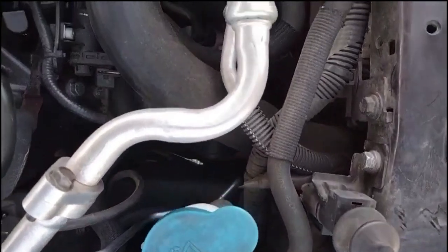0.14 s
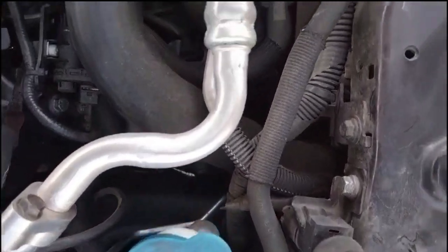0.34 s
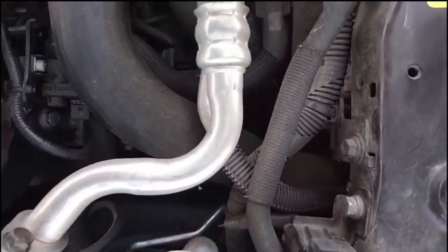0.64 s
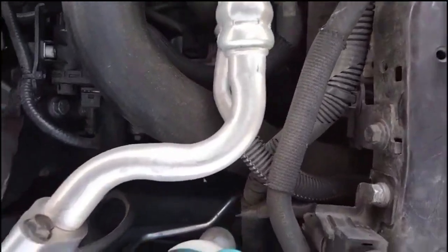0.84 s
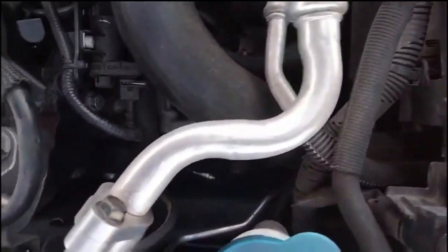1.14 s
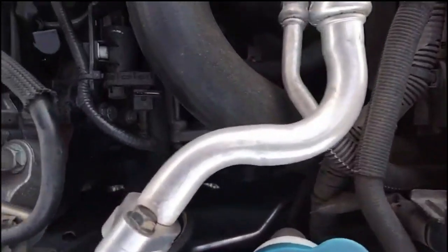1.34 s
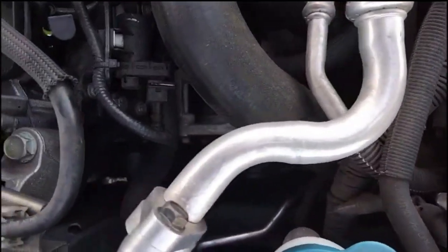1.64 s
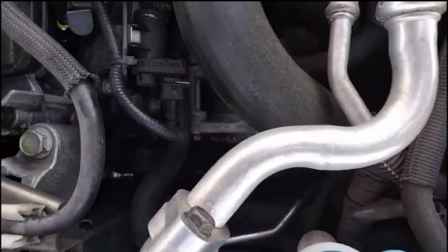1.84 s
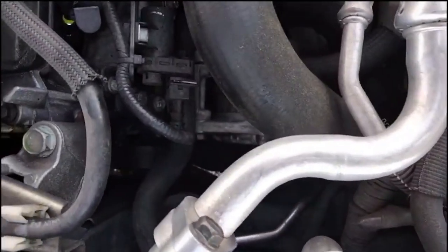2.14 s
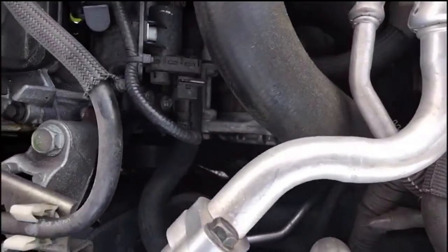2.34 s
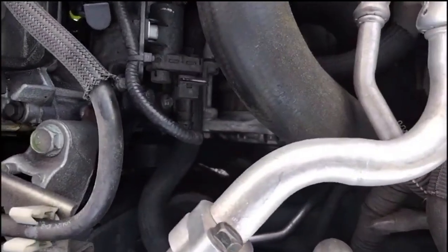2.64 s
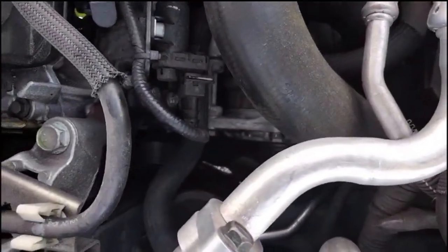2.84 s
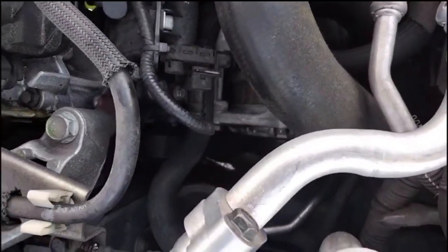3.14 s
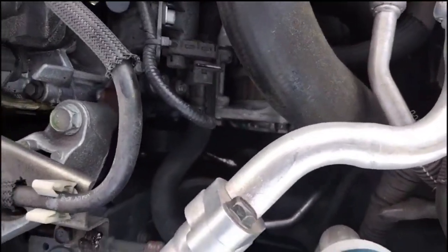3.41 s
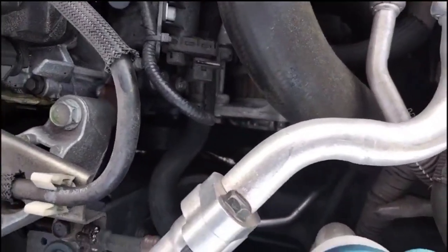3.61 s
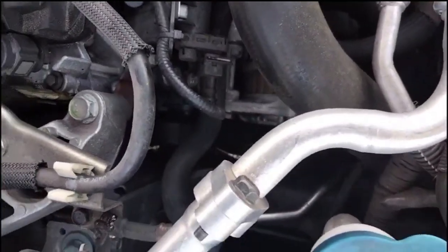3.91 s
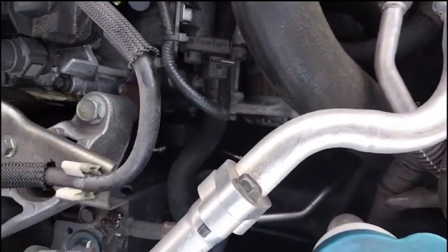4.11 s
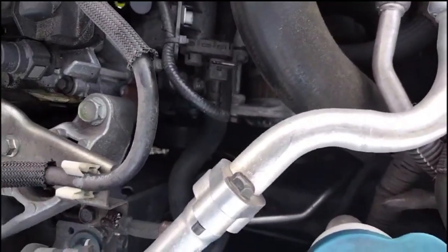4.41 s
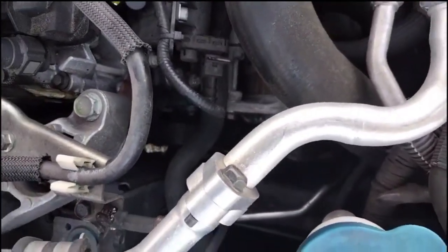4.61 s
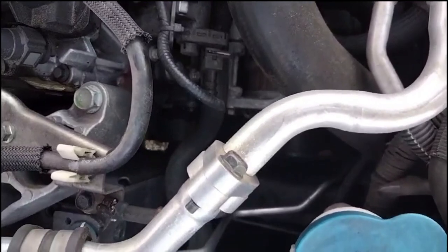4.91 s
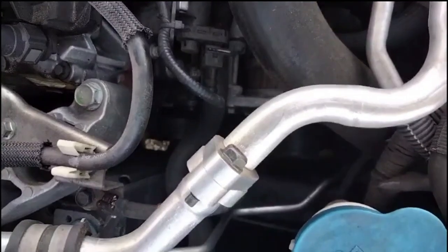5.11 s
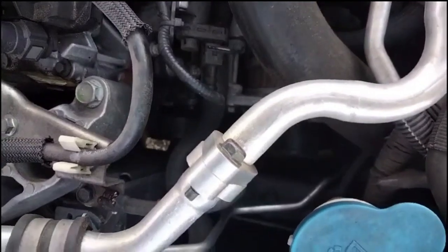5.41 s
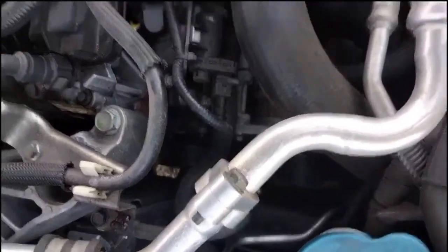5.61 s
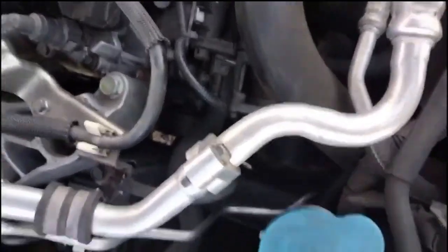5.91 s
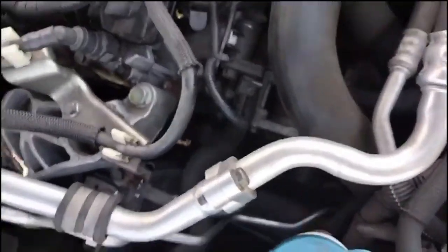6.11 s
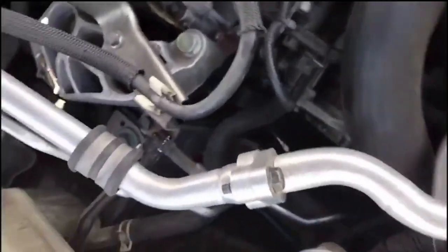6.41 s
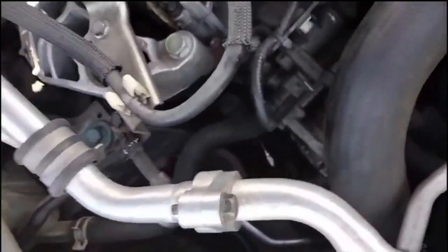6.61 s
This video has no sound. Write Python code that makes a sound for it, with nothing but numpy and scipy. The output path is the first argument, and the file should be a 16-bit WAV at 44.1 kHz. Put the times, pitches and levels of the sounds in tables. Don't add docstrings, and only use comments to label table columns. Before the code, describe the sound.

Close under an open bonnet, a four-cylinder diesel idles steadily, about twenty-eight dull thuds a second blurred into a rattling, knocking roar. In front of it a worn belt slips on its pulley, chirping in rapid bright squeaks that swell and thin several times a second, with a thin wavering whistle near the top of hearing. A small handheld recorder with pumping gain catches it, dry and bright.

```python
import sys
import numpy as np
from scipy import signal
from scipy.fft import rfft, irfft, next_fast_len
from scipy.io import wavfile
from scipy.ndimage import uniform_filter1d, minimum_filter1d, map_coordinates

SR = 44100
rng = np.random.default_rng(int(sys.argv[2]) if len(sys.argv) > 2 else 0)


def level_to_linear(level):
    exponent = np.asarray(level, float) / 20
    return 10 ** exponent


def to_wav(s):
    ch = np.atleast_2d(s).T
    pcm = np.round(np.clip(ch, -1, 1) * 32767)
    wavfile.write(sys.argv[1], SR, pcm.astype(np.int16))


N = 297675

IDLE_HZ = 14.155
BELT_LOOPS = .2926
STRAY_S = 0.01082
FULL_DB, KNEE_DB = -16, 3
STICK_DB = -28.5
SPREAD = 1.5

# time in seconds, lead in turns.
CRANK_DRIFT = [(0.0, -0.13), (0.4, -0.132), (0.9, -0.119), (1.4, -0.114), (1.9, -0.12), (2.4, -0.117),
               (2.9, -0.104), (3.4, -0.102), (3.9, -0.106), (4.4, -0.105), (4.9, -0.104), (5.4, -0.1),
               (5.9, -0.107), (6.4, -0.118), (6.75, -0.116)]
# time in seconds, level in dB.
BLOCK_LEVEL = [(0, -36.5), (1.1, -36.5), (2.1, -35.5), (3.4, -34.5), (4.5, -35.5), (5.4, -34.5), (6.1, -37),
               (6.75, -34)]
# centre in seconds, depth in dB, half width in seconds.
GAIN_DUCKS = [(1.14, -2, 0.057), (1.42, -5.5, 0.039), (1.8, -4.5, 0.041), (2.28, -4, 0.13),
              (2.55, -3.5, 0.053), (2.96, -3.5, 0.074), (3.11, -7, 0.046), (3.5, -4, 0.068),
              (3.9, -2, 0.082), (4.25, -4, .06), (4.68, -2, 0.14), (5.17, -1.5, 0.066), (5.44, -5.5, 0.048),
              (5.76, -7, 0.073), (6.38, -2.5, 0.049), (6.69, -5, 0.072)]
# frequency in Hz, density in dB per Hz.
AIR_SPECTRUM = [(2060, -10.5), (3500, -18), (4780, -10), (5460, -24), (6570, -5.5), (8970, 0),
                (9990, -10.5), (12600, -12.5), (14500, 1.5), (15400, -2), (16000, -36)]
# frequency in Hz, level in dB.
EXHAUST_PIPE = [(14, -52), (28, -3), (57, 2.5), (85, -9.5), (113, -13), (142, -9.5), (200, -20.5),
                (300, -22), (600, -60)]
# time in seconds, pitch in Hz, level in dB.
FAN = [
    (3.9, 49, -64),
    (4.4, 50.7, -41),
    (5.2, 48.1, -44),
    (6, 47.43, -43),
    (6.75, 48, -38),
]
# low knock in dB, high knock in dB, thud in dB,
# valve tick in dB, cover knock in dB.
CYLINDERS = [(-15, 3.5, 3, -6.5, -6.5), (4, 7, 1.5, -16, 8), (-12.5, 4.5, 2.5, -6, 4.5),
             (-5, 6.5, 1.5, -17.5, 7)]
# frequency in Hz, width in Hz, level in dB.
BLOCK_MODES = [(621, 12, 0.5), (667.3, 22, 11), (809, 30, -5)]
# frequency in Hz, width in Hz, level in dB.
HEAD_MODES = [(1400, 150, -10), (1670, 110, 0), (2050, 50, -2), (3430, 150, -8), (3930, 120, -11)]
# frequency in Hz, width in Hz, level in dB.
COVER_MODES = [(960, 270, 4.5), (1127, 70, 12.5)]
# frequency in Hz, level in dB.
GEARS = [(877.5, -49.5), (904.4, -56.5)]
# frequency in Hz, density in dB per Hz.
ROAR_SPECTRUM = [(20, -22), (40, -18), (70, -6), (110, -11.5), (389, -19.5), (671, -9), (1240, -20.5),
                 (1660, -17.5), (2050, -31), (2500, -24), (3350, -19), (4500, -26), (6000, -82)]
# time in seconds, level in dB.
WHISTLE_LEVEL = [(0.0, -30), (0.28, -26), (0.83, -31), (1.73, -21), (1.77, -29), (1.84, -24), (2.1, -21),
                 (2.16, -24.5), (2.71, -22), (3.14, -24.5), (3.27, -22.5), (5.38, -25), (5.43, -31),
                 (5.85, -17), (5.96, -26.5), (6.67, -30), (6.73, -33), (6.75, -25)]
# cycles a turn, swing in Hz, lag in cycles of the
WHISTLE_SWING = [(0.5852, 136, 0.88), (0.8778, 220, 0.22), (1.1704, 59, 0.97), (1.463, 85, 0.09),
                 (1.7556, 122, 0.81), (2.3408, 67, 0.94), (2.926, 59, 0.75), (3.2186, 57, 0.43),
                 (1, 173, 0.02), (2, 153, 0.08), (4, 56, 0.5), (4.628, 104, 0.6)]
# frequency in Hz, width in Hz, level in dB.
PULLEY_MODES = [(4855, 120, -11.5), (5060, 26, 1), (5353, 86, 0.5), (5510, 68, 1.5), (5790, 360, -3),
                (7500, 160, -4), (8450, 490, -5), (9135, 89, 0), (10500, 790, -9.5), (11600, 230, -13)]
# slip in dB, low tone in Hz, high over low tone in dB,
# high tone in Hz.
BELT_WEAR = [(-70, 6600, -1, 9220.0), (-55.5, 5470.0, 9, 8400), (-39.6, 5300.0, 7, 8300),
             (-36, 5490.0, -0.0, 9090.0), (-28, 5540.0, 1, 9190.0), (-32, 5420.0, 0.1, 8930.0),
             (-22, 5510.0, -2.5, 8690.0), (-27.5, 5700.0, 1.3, 8840.0), (-30.5, 5340.0, 2, 9260.0),
             (-24, 5340.0, -0.5, 9260.0), (-27, 5480.0, -1.8, 9160.0), (-19.5, 5510.0, 0.3, 9530.0),
             (-33.5, 5710.0, -3.5, 9260.0), (-36.5, 5650.0, -2, 9270.0), (-42.5, 5600.0, -5, 9190.0),
             (-30.5, 5370.0, -0.5, 8970.0), (-35.5, 5690.0, 1.5, 8470.0), (-84, 6600, 3, 9110.0),
             (-39, 5330.0, 3, 9210.0), (-28, 5200.0, -0.2, 9430.0), (-27.5, 5040.0, 3.5, 9570.0),
             (-30, 5490.0, -3.5, 9170.0), (-36, 5600.0, -6, 9420.0), (-22, 5560.0, -2, 8700),
             (-46.5, 5480.0, 4, 9030.0), (-38.5, 5480.0, 4, 8830.0), (-37, 5640.0, -3.5, 8190.0),
             (-49, 5560.0, -0.2, 8000)]
# cycles a turn, slip in dB, lag in cycles of the
JERK = [(0.5, 0.9, 0.16), (1.0, 6.1, 0.57), (2.0, 9.2, 0.1), (3.0, 1.0, 0.1), (4.0, 3.7, 0.83),
        (4.628, 2.0, 0.19), (2.628, 2.4, 0.15), (0.628, 2.7, 0.35), (6.628, 0.3, 0.03)]
# cycles a turn, low tone in Hz, its lag in cycles of the beat, high
# tone in dB, its lag in cycles of the beat.
TENSION = [(0.5, 10.4, 0.3, 0.9, 0.59), (1.0, 172.5, 0.04, 1.2, 0.64), (2.0, 172.2, 0.04, 1.8, 0.74),
           (3.0, 21.4, 0.7, 1.5, 0.43), (4.0, 28.4, 0.85, 1.5, 0.51), (4.628, 49.5, 0.73, 1.0, 0.97),
           (2.628, 8.5, 0.92, 0.4, 0.25)]
# time in seconds, slip in dB, low tone in Hz,
# high tone in dB.
STRAYS = [(0.043, -11.5, -4, 0.5), (0.686, -15, 0.0, -2), (0.793, 9.7, -20.5, 1.5), (0.867, 12, -180.0, 4),
          (1.171, -14, 2, 2), (1.351, 18, 116, -6), (1.741, -11.5, -3.5, 5.5), (1.982, 10.1, -75.5, 4),
          (2.072, 11, -140.0, -1.5), (2.301, 11, -9.5, 4), (2.484, 9, 27.5, -2.9), (2.553, 15.6, 145, -0.5),
          (2.834, -21.7, -0.0, 0.0), (2.862, -9.6, 0.5, 4), (3.434, -7.5, 1, 3.5), (3.765, 9.5, 78, 1.5),
          (3.96, 8.8, 9, 2), (4.244, 13.2, -47.5, 7), (4.954, 14, -0.0, -3), (5.093, 16, 10.0, -9),
          (5.199, 14, 9, -5.5), (5.278, 9.2, 13, -6), (5.371, 8, -8, -3), (5.598, 12, -29.5, -4),
          (5.902, -12.5, 1, 2), (6.131, -10, -2, -0.0), (6.224, -20.3, -8, -0.0), (6.375, 7.1, 17.5, 0),
          (6.649, 21, -80, 1), (6.68, 27, -190.0, -2.5)]


def unit(x):
    return x / np.sqrt(np.mean(x ** 2) + 1e-20)


def along(points, hz):
    f, v = np.transpose(points)
    return np.interp(np.log(hz + 1), np.log(f + 1), v)


def curves(rows):
    s, *cols = np.transpose(rows)
    return [np.interp(np.arange(N) / SR, s, c) for c in cols]


def wobble(rate):
    knots = rng.standard_normal(int(N * 2000 / SR))
    return unit(map_coordinates(knots, [np.arange(N) * rate / SR]))


def filtered(x, response):
    m = 2 * next_fast_len(N // 2 + SR // 4)
    return irfft(rfft(x, m) * response(np.fft.rfftfreq(m, 1 / SR)), m)[:N]


def modes(table):
    def response(f):
        total = 0
        for k, (centre, width, db) in enumerate(table):
            damping = 1j * f * width
            total = total + (-1) ** k * level_to_linear(db) * damping / (centre * centre - f * f + damping)
        return total
    return response


def hiss(spectrum):
    return unit(filtered(rng.standard_normal(N), lambda hz: level_to_linear(along(spectrum, hz))))


def sine(hz):
    return np.sin(2 * np.pi * np.cumsum(hz) / SR)


def turns():
    return IDLE_HZ * np.arange(N) / SR + curves(CRANK_DRIFT)[0]


def beat(cycles, size, lag):
    return size * np.cos(2 * np.pi * (cycles * turns() - lag))


def firings(lag, column, scatter_db):
    stroke = np.floor(2 * (turns() - lag)).astype(int) + 4
    size_db = np.array(CYLINDERS)[stroke % len(CYLINDERS), column] + scatter_db * rng.standard_normal(N)
    return level_to_linear(size_db) * (np.diff(stroke, prepend=stroke[0]) > 0)


def bursts(pulses, rise, same):
    u = np.arange(SR // 20) / SR / rise
    shape = u * np.exp(1 - u)
    alike = signal.fftconvolve(pulses, shape * rng.standard_normal(len(u)))[:N]
    fresh = signal.fftconvolve(pulses, shape)[:N] * rng.standard_normal(N)
    return same * alike + (1 - same) * fresh


def gain_db():
    t = np.arange(N) / SR
    return curves(BLOCK_LEVEL)[0] + sum(db * np.exp(-((t - s) / width) ** 2) for s, db, width in GAIN_DUCKS)


def air():
    breath_db = 2.35 * np.cos(4 * np.pi * (turns() - .07)) + 1.94 * wobble(25)
    slips = bursts(firings(-0.06, column=2, scatter_db=5), rise=0.0069, same=0)
    faint = level_to_linear(-10.5) * unit(filtered(slips, modes(PULLEY_MODES)))
    return level_to_linear(gain_db() + 5.0) * (level_to_linear(breath_db) * hiss(AIR_SPECTRUM) + faint)


def exhaust():
    pipe = lambda hz: level_to_linear(along(EXHAUST_PIPE, hz)) * np.exp(1j / (1 + (hz / 40) ** 4))
    thuds = -unit(filtered(firings(.375, column=2, scatter_db=.8), pipe))
    return level_to_linear(gain_db() - 1.0) * thuds


def fan():
    fan_hz, fan_db = curves(FAN)
    return level_to_linear(fan_db + 2.0) * sine(fan_hz)


def block():
    valves = firings(.3, column=3, scatter_db=0.0)
    low = bursts(firings(.12, column=0, scatter_db=1) + valves, rise=.0012, same=.85)
    mid = bursts(firings(.06, column=4, scatter_db=1.2) + valves, rise=.0055, same=.7)
    high = bursts(firings(.065, column=1, scatter_db=1.2) + .4 * valves, rise=.0035, same=.3)
    knock = level_to_linear(-8) * unit(filtered(low, modes(BLOCK_MODES)))
    knock = knock + level_to_linear(-14.5) * unit(filtered(mid, modes(COVER_MODES)))
    knock = knock + level_to_linear(-7.5) * unit(filtered(high, modes(HEAD_MODES)))
    steady = level_to_linear(-17) * unit(filtered(rng.standard_normal(N), modes(BLOCK_MODES + HEAD_MODES)))
    roar = level_to_linear(-1.5) * hiss(ROAR_SPECTRUM)
    lull_db = 2.0 * np.cos(4 * np.pi * (turns() - .23)) + 0.94 * wobble(12)
    gears = 0
    for hz, db in GEARS:
        gears = gears + level_to_linear(db + 41.7 + .4 * wobble(3)) * np.sin(2 * np.pi * hz / IDLE_HZ * turns())
    return level_to_linear(gain_db()) * (knock + level_to_linear(lull_db) * (steady + roar) + gears)


def whistle():
    swing = sum(beat(*row) for row in WHISTLE_SWING)
    snags = (rng.random(N) < 60 / SR) * rng.random(N) * np.clip(.5 - swing / 500, 0, 1.3)
    u = np.arange(SR // 50) / SR / .0016
    slips = signal.fftconvolve(snags, u * np.exp(1 - u))[:N]
    pitch_hz = 14620 + 1.2 * swing + 130 * wobble(170) + 70 * wobble(500) - 600 * slips
    drag_db = -3.5 * slips - 0.0073 * swing - 2.9 * np.cos(4 * np.pi * (turns() - .06))
    grip = 1 + .55 * wobble(300) + .25 * wobble(900)
    ride_db = -0.4 + 0.56 * (gain_db() - curves(BLOCK_LEVEL)[0] + 3.0)
    level_db = curves(WHISTLE_LEVEL)[0] + ride_db + drag_db + 1.3 * wobble(50)
    return level_to_linear(level_db) * grip * sine(pitch_hz)


def slipping():
    t = np.arange(N) / SR
    place = BELT_LOOPS * turns() % 1 * len(BELT_WEAR)
    wear = [map_coordinates(c, [place], mode="grid-wrap") for c in np.transpose(BELT_WEAR)]
    slip_db, low_hz, high_db, high_hz = wear
    stray = sum(np.outer(change, np.exp(-((t - s) / STRAY_S) ** 2)) for s, *change in STRAYS)
    slip_db = slip_db + stray[0] + sum(beat(*row) for row in JERK) + 1.2 * wobble(70)
    low_hz = low_hz + stray[1] + sum(beat(c, hz, lag) for c, hz, lag, _, _ in TENSION)
    high_db = high_db + stray[2] + sum(beat(c, db, lag) for c, _, _, db, lag in TENSION) + 0.85 * wobble(30)

    soft = lambda over_db: KNEE_DB * np.logaddexp(0, over_db / KNEE_DB)
    db = FULL_DB + 1.45 - soft(FULL_DB - slip_db) - 1.0 * soft(STICK_DB - slip_db)
    db = db + 1.1 * (gain_db() + 36.0) + 0.71 * wobble(60)

    wider = lambda hz, mid_hz: mid_hz + SPREAD * (hz - mid_hz)
    upper_hz = np.array([hz for hz, _, _ in PULLEY_MODES if hz > 7000])
    high_hz = wider(high_hz, 9150) + 250 * wobble(25)
    nearest = abs(high_hz[:, None] - upper_hz).argmin(axis=1)
    locked_hz = uniform_filter1d(upper_hz[nearest] * 1., size=90)
    return db, wider(low_hz, 5440), high_db, .75 * locked_hz + .25 * high_hz


def chirps():
    db, low_hz, high_db, high_hz = slipping()
    low_flutter = 1 + .45 * wobble(350)
    high_flutter = 1 + .7 * wobble(450)
    octave_flutter = 1 + .8 * wobble(400)
    drift = 2 * np.pi * np.cumsum(90 * wobble(330)) / SR
    glide = 2 * np.pi * np.cumsum(low_hz) / SR + drift
    low = low_flutter * np.sin(glide)
    high = high_flutter * np.sin(2 * np.pi * np.cumsum(high_hz) / SR + 0.598 * drift)
    octave = level_to_linear(-10.5 + 3.2 * wobble(30)) * octave_flutter * np.sin(2 * glide)
    tones = level_to_linear(db - 2.0) * low + level_to_linear(db + high_db - 0.93) * (high + octave)
    scrape = level_to_linear(db + high_db + 2.5) * rng.standard_normal(N)
    return 0.79 * tones + filtered(scrape + 0.34 * tones, modes(PULLEY_MODES))


def bay(x):
    t = np.arange(SR // 10) / SR
    tail = rng.standard_normal(len(t)) * level_to_linear(-60 * t / .06)
    return signal.fftconvolve(x, tail / np.linalg.norm(tail))[:N]


def scene():
    belt = chirps() + whistle()
    return (air() + fan() + exhaust() + block() + belt + level_to_linear(-8.0) * bay(belt))[None]


def top_cut(x):
    return signal.sosfilt(signal.butter(12, 16380, fs=SR, output="sos"), x)


def record(dry):
    limit = (1 + abs(dry[0] / .56) ** 4) ** -.25
    held = dry[0] * uniform_filter1d(minimum_filter1d(limit, size=60), size=40)
    held = filtered(held, lambda hz: 1 / (1 + (hz / 15750) ** 120))
    return top_cut(held[None])


dry = scene()
out = record(dry)
to_wav(out)
```